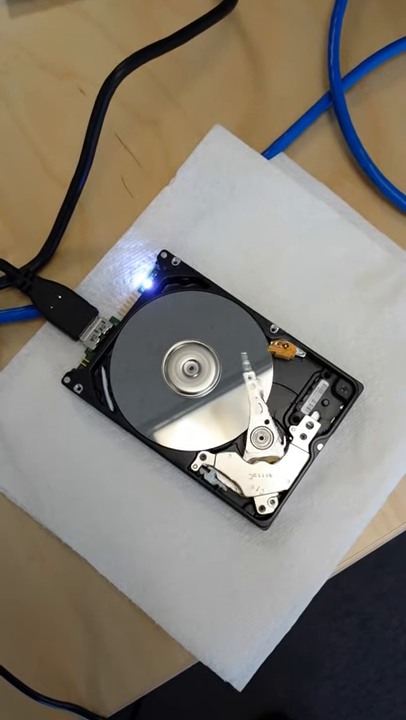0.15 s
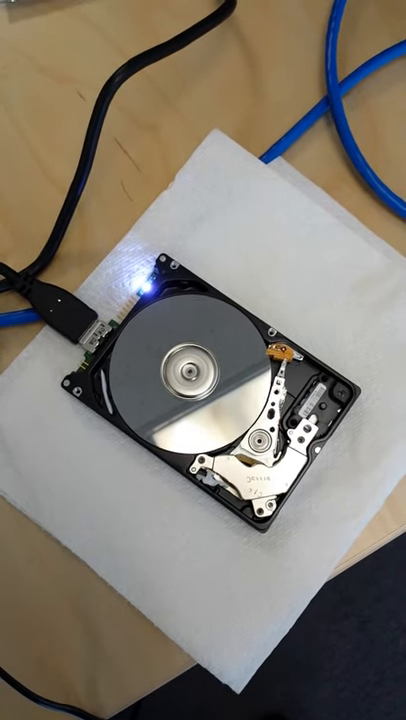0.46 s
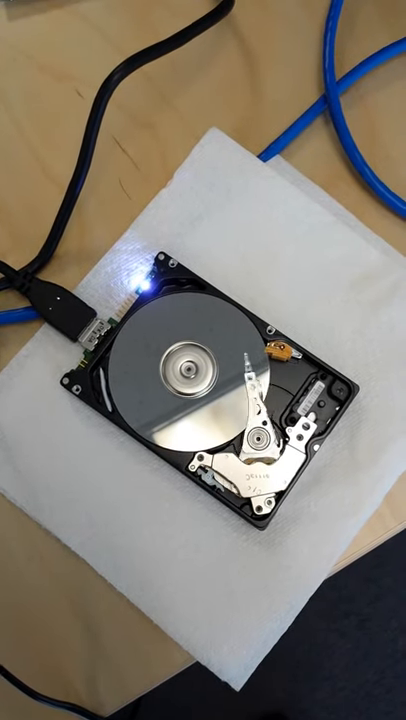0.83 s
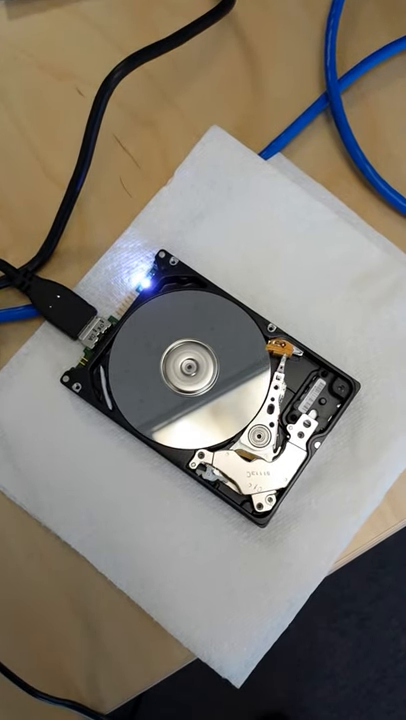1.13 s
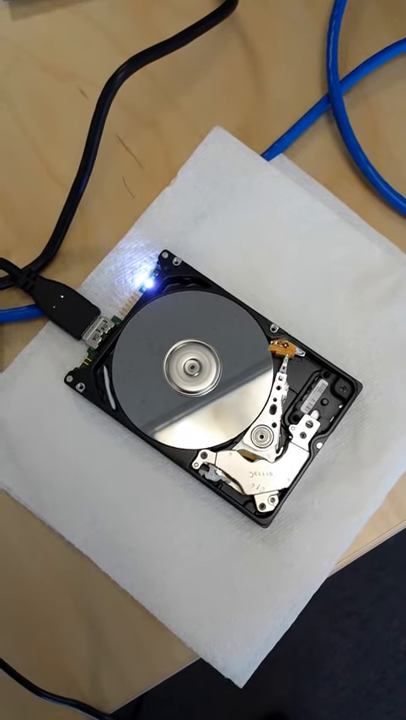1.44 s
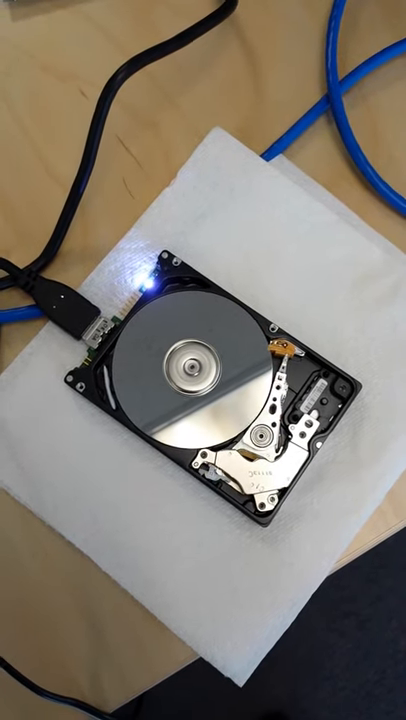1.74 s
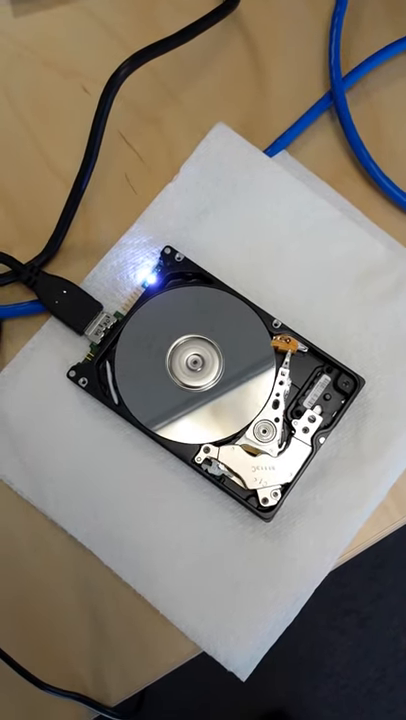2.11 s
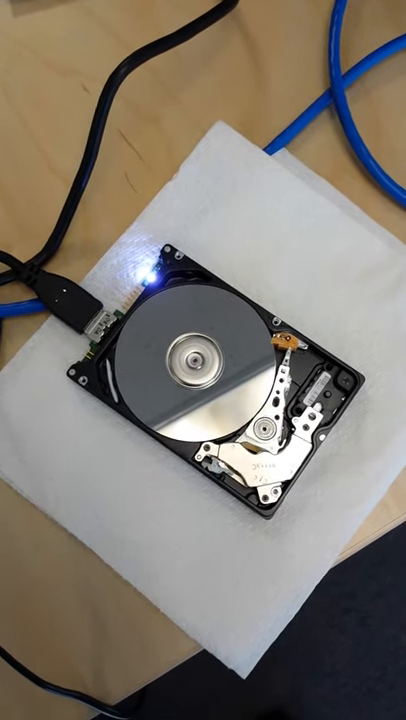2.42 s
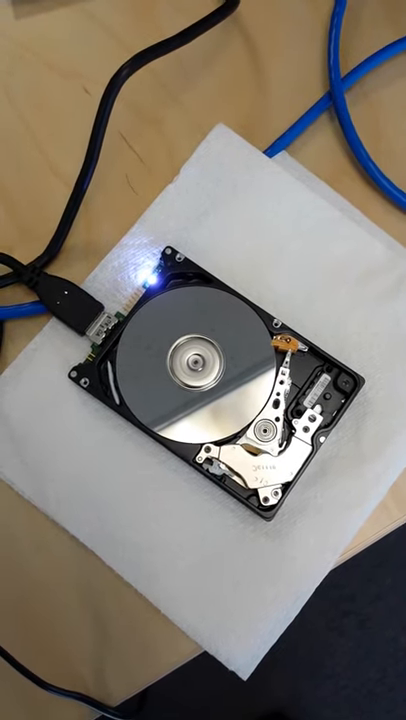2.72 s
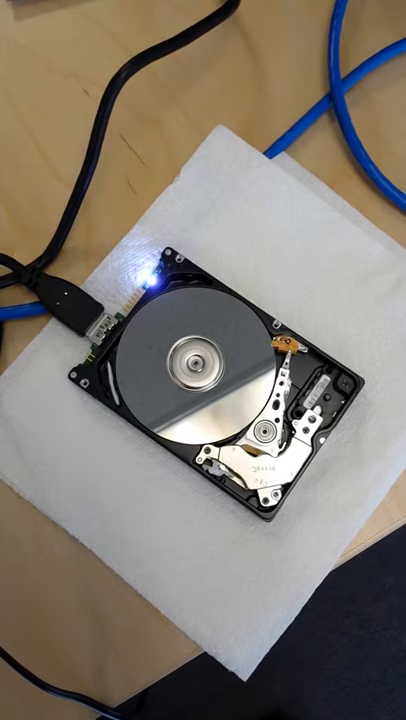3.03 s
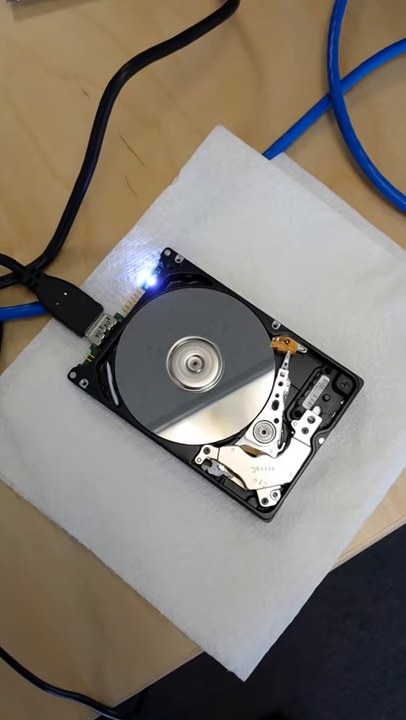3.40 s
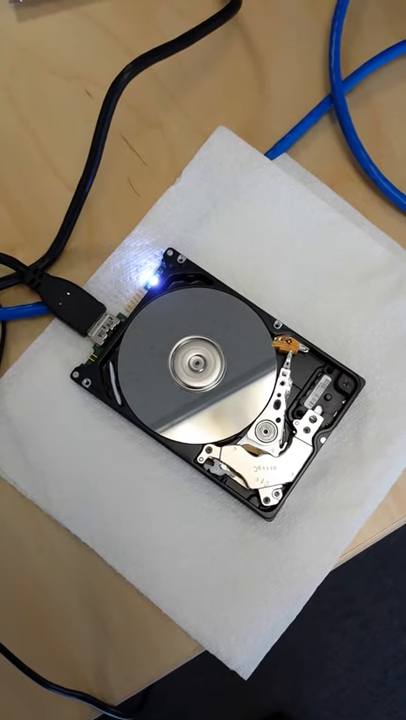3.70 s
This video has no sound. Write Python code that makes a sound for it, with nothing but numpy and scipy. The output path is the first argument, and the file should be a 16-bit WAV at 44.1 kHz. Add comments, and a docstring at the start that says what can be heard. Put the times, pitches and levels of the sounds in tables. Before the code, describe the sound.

An opened hard drive's arm gives a scratchy rattle of clicks early, then a louder burst about a second in; thin platter hiss fades over steady room hum and rumble, recorded very close, stronger left.

```python
"""On a desk, an opened hard drive lies close to the left microphone port, in a room with a steady hum and rumble.
The arm strikes its stops in short rattles: clicks and dragging grit set damped metal modes ringing.
Air over the slowing platter hisses as shaped noise; the rumble is low noise with narrow resonances.
Two soft knocks reach the right port through the hand, each ringing one heavily damped low mode."""
import sys
import numpy as np
from scipy import signal
from scipy.fft import rfft, irfft
from scipy.io import wavfile

SR = 44100
rng = np.random.default_rng(int(sys.argv[2]) if len(sys.argv) > 2 else 0)


def master_out(mix):
    """Clip the mix to full scale and print it as 16-bit PCM to the path in sys.argv[1]."""
    frames = np.transpose(np.atleast_2d(mix))
    ceiling = np.clip(frames, -1, 1)
    pcm = np.round(ceiling * 32767).astype(np.int16)
    wavfile.write(sys.argv[1], SR, pcm)


def volts_from_db(level):
    """Convert decibel levels to linear amplitude ratios."""
    exponent = np.asarray(level, float) / 20
    return 10 ** exponent


N = 170226
T = np.arange(N) / SR


def rms_one(x):
    """Scale to rms 1."""
    return x / np.sqrt(np.mean(x ** 2) + 1e-20)


def at_hz(points, hz):
    """Read a table on a log-frequency axis."""
    table_hz, value = np.transpose(points)
    return np.interp(np.log(hz + 1), np.log(table_hz), value)


def bumps(table, hz):
    """Sum of bell-shaped lifts in dB."""
    return sum(lift_db / (1 + (2 * (hz - centre_hz) / width_hz) ** 2) for centre_hz, width_hz, lift_db in table)


def sides(pan_db):
    """Left port keeps its level, right port is pan_db lower."""
    return np.array([[1], [volts_from_db(-pan_db)]])


def ring(x, hz, t60_s):
    """A damped resonator: a unit click sets a sine of height 1 ringing, down 60 dB after t60_s."""
    r = volts_from_db(-60 / (t60_s * SR))
    w = 2 * np.pi * hz / SR
    return signal.lfilter([0, np.sin(w)], [1, -2 * r * np.cos(w), r * r], x + 1e-18)


# likeness of the two ports in diffuse sound: pitch_hz, correlation (1 = the same)
PORT_LIKENESS = [(30, .8), (60, 0.73), (120, 0.86), (250, 0.83), (500, 0.81), (1000, 0.87), (2000, 0.1),
                 (4000, .2), (8000, .05)]
# lead of the left port over the right: pitch_hz, phase_rad
PORT_LEAD = [(300, 0.01), (780, 1.34), (2000, 1.27)]


def coloured(gain_db):
    """Steady stereo noise with a gain per frequency and the room's likeness and lag between ports."""
    hz = np.fft.rfftfreq(N, 1 / SR)
    mid, side = rfft(rng.standard_normal((2, N)))
    alike = np.clip(at_hz(PORT_LIKENESS, hz), -.99, .99)
    ports = np.sqrt(1 + alike) * mid + np.sqrt(1 - alike) * side * [[1], [-1]]
    right_lag = np.exp(-1j * at_hz(PORT_LEAD, hz) * np.array([[0], [1]]))
    return irfft(right_lag * volts_from_db(gain_db(hz)) * ports, N)


def hum():
    """The room's hum is one steady low sine."""
    pitch_hz, left_rms_db, pan_db = 120.3, -37.5, 1.55
    return volts_from_db(left_rms_db) * np.sqrt(2) * np.sin(2 * np.pi * pitch_hz * T) * sides(pan_db)


# broad colour of the rumble: pitch_hz, relative density_db per Hz
RUMBLE_COLOUR = [(20, -27), (50, -4.5), (100, -2.5), (160, -1.5), (300, -4.5), (500, -5.5), (700, -8.5),
                 (1000, -14), (1500, -24.5), (2500, -38.5)]
# narrow resonances in the rumble: pitch_hz, width_hz, lift_db
RUMBLE_RESONANCES = [(134.7, 15.7, 11), (140.8, 2.7, 4), (227.5, 9.1, 11), (259.7, 11.4, 9.5),
                     (351.6, 8.4, 7), (388, 17, 3.5), (467.3, 8.3, 7.5), (542, 8.8, 10), (736.8, 8.6, 13),
                     (765, 19, 9), (1880, 26, 13.5)]
# balance of the rumble between ports: pitch_hz, left_over_right_db
RUMBLE_BALANCE = [(60, 4), (120, 2), (240, 2.5), (480, 6.0), (950, 5.5), (1890, 14.5), (3770, 25),
                  (7520, 15), (15000, -8.5)]


def rumble():
    """Low room noise whose narrow resonances lift single bands."""
    def gain_db(hz):
        balance_db = at_hz(RUMBLE_BALANCE, hz) / 2 * np.array([[1], [-1]])
        return at_hz(RUMBLE_COLOUR, hz) + bumps(RUMBLE_RESONANCES, hz) + balance_db

    rms_db = -39.5
    return volts_from_db(rms_db) * rms_one(coloured(gain_db))


# air noise over the platter as it slows: time_s, left_rms_db (before a 3 dB lift)
WINDAGE_LEVEL = [(0.0, -52), (0.29, -57.5), (0.46, -53.5), (0.68, -52), (0.85, -54), (1.13, -56),
                 (1.32, -51.5), (1.69, -55.5), (2.69, -58.5), (3.86, -59)]
# broad colour of the air noise: pitch_hz, relative density_db per Hz
AIR_COLOUR = [(800, -27), (1300, -12.5), (2300, -9.5), (3300, -8.5), (4500, -2), (6200, -7.5),
              (7500, -11.5), (8500, -12.5), (10000, -48.5), (14000, -68)]
# whirring bands in the air noise: pitch_hz, width_hz, lift_db
WHIRR_BANDS = [(2000, 650, 10), (2880, 320, 9.5), (3940, 340, 5.5), (5380, 700, 6), (7100, 500, 7)]


def windage():
    """Air dragged by the slowing platter hisses: shaped noise rises and falls, ending at its faintest."""
    pan_db = 11
    time_s, level_db = np.transpose(WINDAGE_LEVEL)
    hiss = rms_one(coloured(lambda hz: at_hz(AIR_COLOUR, hz) + bumps(WHIRR_BANDS, hz)))
    return hiss * volts_from_db(np.interp(T, time_s, level_db)) * sides(pan_db) / np.sqrt(.5)  # 3 dB lift


# soft knocks through the hand: start_s, push_db (before a 7 dB lift and the softening)
KNOCK_PUSHES = [(0.5453, -21.5), (2.2018, -21.5)]


def knocks():
    """A soft push rings one heavily damped low mode, mostly at the right port."""
    pitch_hz, t60_s, left_db = 148, 0.039, -35.5
    soft_hz, floor_hz = 500, 90  # the hand dulls the push and weakens what lies below the floor
    push = np.zeros(N)
    for start_s, push_db in KNOCK_PUSHES:
        push[int(start_s * SR)] = -volts_from_db(push_db + 7.0)
    push = signal.sosfilt(signal.butter(1, soft_hz, fs=SR, output="sos"), push)
    push = signal.sosfilt(signal.butter(2, floor_hz, "high", fs=SR, output="sos"), push)
    return ring(push, pitch_hz, t60_s) * np.array([[volts_from_db(left_db)], [1]])


def room(x):
    """A short diffuse tail of decaying noise, unrelated in the two ports."""
    t60_s, level_db, pan_db = 0.21, -17, 23
    t = T[:SR // 2]
    tail = rng.standard_normal((2, len(t))) * volts_from_db(-60 * t / t60_s) * (t > .002)
    tail /= np.sqrt(np.sum(tail[0] ** 2))
    echo = signal.fftconvolve(x[None], tail, axes=1)[:, :N]
    return volts_from_db(level_db) * sides(pan_db) * echo


def swell(x, hz):
    """A contact takes time: a broad resonance at the mode's pitch swells it in under a millisecond."""
    width_hz = 1500
    r = np.exp(-np.pi * width_hz / SR)
    feedback = [1, -2 * r * np.cos(2 * np.pi * hz / SR), r * r]
    return signal.lfilter([(1 - r * r) / 2, 0, (r * r - 1) / 2], feedback, x + 1e-18)


# arm contacts: start_s, strike_db (before share and spread), then body_db, low_db, high_db against it
ARM_CONTACTS = [(0.2195, -40.0, -15.0, -10.0, -15.0), (0.2245, -40.0, -15.0, -10.0, -15.0),
                (0.2478, -24.0, -31.0, -22.0, -15.0), (0.2692, -16.0, -14.0, -4.0, -23.0),
                (0.2735, -17.0, -22.0, -13.0, -19.0), (0.2766, -25.0, -23.0, -17.0, -31.0),
                (0.2785, -30.0, -10.0, -10.0, -25.0), (0.338, -38.0, -8.0, -8.0, -15.0),
                (0.341, -38.0, -8.0, -8.0, -15.0), (0.3668, -22.0, -13.0, -10.0, -20.0),
                (0.373, -34.0, -12.0, -3.0, -15.0), (0.3778, -27.0, -9.0, -6.0, -20.0),
                (0.3903, -35.0, -19.0, -11.0, -22.0), (0.3938, -33.0, -17.0, -11.0, -26.0),
                (0.4062, -29.0, -22.0, -16.0, -19.0), (0.4189, -17.0, -21.0, -15.0, -11.0),
                (0.4208, -12.0, -34.0, -18.0, -6.0), (0.424, -18.0, -24.0, -23.0, -10.0),
                (0.4268, -12.0, -31.0, -22.0, -11.0), (0.4303, -30.0, -16.0, -15.0, -3.0),
                (0.434, -31.0, -18.0, -20.0, -10.0), (0.438, -35.0, -21.0, -13.0, -3.0),
                (0.4403, -30.0, -19.0, -12.0, -13.0), (0.6492, -36.0, -21.0, -15.0, -19.0),
                (0.6527, -36.0, -23.0, -17.0, -27.0), (0.6599, -35.0, -22.0, -16.0, -27.0),
                (0.6778, -36.0, -12.0, -17.0, -25.0), (0.6812, -39.0, -10.0, -11.0, -26.0),
                (0.7179, -33.0, -21.0, -16.0, -11.0), (1.0418, -39.0, -10.0, -2.0, -17.0),
                (1.1363, -19.0, -12.0, -3.0, -18.0), (1.1375, -18.0, -16.0, 0.0, -17.0),
                (1.1462, -18.0, -14.0, -6.0, -16.0), (1.1496, -7.0, -26.0, -14.0, -20.0),
                (1.1536, -17.0, -20.0, -15.0, -13.0), (1.1549, -20.0, -15.0, -11.0, -21.0),
                (1.1588, -13.0, -19.0, -10.0, -15.0), (1.1619, -16.0, -15.0, -9.0, -18.0),
                (1.1634, -13.0, -26.0, -10.0, -17.0), (1.17, -13.0, -14.0, -11.0, -15.0),
                (1.1718, -16.0, -20.0, -11.0, -15.0), (1.1736, -14.0, -10.0, -9.0, -16.0),
                (1.1761, -11.0, -21.0, -8.0, -13.0), (1.183, -10.0, -23.0, -8.0, -5.0),
                (1.1868, -10.0, -23.0, -15.0, -23.0), (1.1923, -29.0, -10.0, -1.0, -8.0),
                (1.1961, -26.0, -11.0, -13.0, -14.0), (1.2904, -21.0, -27.0, -20.0, -28.0),
                (1.2919, -28.0, -24.0, -8.0, -19.0)]
# arm dragging along its ramp: start_s, end_s, force_db (before share), brightness_db
ARM_DRAGS = [(.2685, .279, -26, -3), (.3655, .371, -27, -3), (.3755, .381, -33, -4), (.405, .418, -40, 2.5),
             (.4178, .429, -27, 6), (.648, .685, -46, -2), (1.1360, 1.141, -22, -5),
             (1.1458, 1.1525, -19, 0), (1.1525, 1.175, -22, 0), (1.175, 1.1908, -19, 0)]
# damped modes of arm and frame, four groups: pitch_hz, level_db, t60_s, left_over_right_db
BODY = [(1541, -11.5, 0.058, 8.6), (1804, -2, 0.014, 4.3), (1963, -4, 0.019, 5), (2500, -5.5, 0.0074, 5.9)]
LOW = [(2985, -8.5, 0.0057, 11), (3584, -4.5, 0.013, 19), (3795, -1.5, 0.014, 16), (4140, -7, 0.011, 18)]
MIDDLE = [(4900, -13, 0.0091, 11), (5500, -6, 0.0063, 22), (6040, -2.5, 0.006, 40), (6400, -7.5, 0.013, 45),
          (6700, -2.5, 0.0043, 29), (7300, -3.5, 0.0052, 28)]
HIGH = [(8200, -11, .004, 19), (9100, -7, .005, 17), (9700, -5, .004, 17), (10300, -6, .004, 15),
        (11100, -10, .004, 11), (12600, -10, .004, 7), (14200, -14, .003, 5)]
# force shared into body, low, middle and high modes: share_db of each group
STRIKE_SHARE = (1.3, 1.4, 1.2, 3)
DRAG_SHARE = (-17, -9.5, 0.5, -6)
# platter and casting ringing on: pitch_hz, level_db (relative to the whole ring), t60_s
PLATTER_RING = [(1515, -8, .05), (1800, -14, .04), (3240, -13, .06), (3700, -16, .07), (3800, -16, .07),
                (4194, -16, .07), (4323, -17, .08), (4880, -20, .08), (5300, -13, .04), (5610, -16, .07),
                (6035, -7, .07), (6325, -7, .05), (6470, -13, .07), (6735, -16, .07), (7190, -16, .05),
                (7670, -22, .06)]


def arm():
    """Contacts strike each mode a little differently; drags are dense small clicks into the same modes."""
    clicks_per_s, strike_spread_db = 3000, 2.0
    ring_db, ring_pan_db = -29.5, 15
    start_s, strike_db, body_db, low_db, high_db = np.transpose(ARM_CONTACTS)
    at = (start_s * SR).astype(int)
    grit = (rng.random(N) < clicks_per_s / SR) * rng.standard_normal(N) / 2
    # brightness takes from body and low modes and gives to high ones
    groups = zip((BODY, LOW, MIDDLE, HIGH), (body_db, low_db, 0, high_db),
                 STRIKE_SHARE, DRAG_SHARE, (-1, -1, 0, 1))
    out, push = np.zeros((2, N)), np.zeros(N)
    for modes, own_db, strike_share_db, drag_share_db, lean in groups:
        drag = np.zeros(N)
        for begin_s, end_s, force_db, bright_db in ARM_DRAGS:
            gate = (T > begin_s) & (T < end_s)
            drag += grit * gate * volts_from_db(force_db + drag_share_db + lean * bright_db)
        for hz, level_db, t60_s, pan_db in modes:
            force = drag * rng.choice([-1, 1])
            spread_db = rng.normal(0, strike_spread_db, len(at))
            strike = volts_from_db(strike_db + own_db + strike_share_db + spread_db)
            force[at] += strike * rng.choice([-1, 1], len(at))
            out += volts_from_db(level_db) * ring(swell(force, hz), hz, t60_s) * sides(pan_db)
        push += force  # the last mode's force in each group also drives the platter
    for k, (hz, level_db, t60_s) in enumerate(PLATTER_RING):
        tone = volts_from_db(ring_db + level_db) * ring(swell(push, hz), hz, t60_s)
        out += tone * sides(ring_pan_db) * [[1], [(-1) ** k]]  # every other mode is flipped at the right
    return out


def scene():
    """The arm and its room tail over the air, rumble, hum and knocks."""
    clicks = arm()
    return clicks + room(clicks[0]) + windage() + rumble() + hum() + knocks()


def band_limit(x):
    """A steep low-pass at the top of the band."""
    return signal.sosfilt(signal.butter(12, 16500, fs=SR, output="sos"), x)


# faint white noise floor before the top is cut, much fainter at left than right: rms_db
NOISE_FLOOR = [
    [-80],
    [-64],
]


def record(dry):
    """A faint white noise floor joins the scene and a steep low-pass cuts the top."""
    top_hz = 14500
    noisy = dry + volts_from_db(np.array(NOISE_FLOOR)) * rng.standard_normal(dry.shape)
    mix = signal.sosfilt(signal.ellip(8, .3, 20, top_hz, fs=SR, output="sos"), noisy)
    return band_limit(mix)


dry = scene()
out = record(dry)
master_out(out)
```